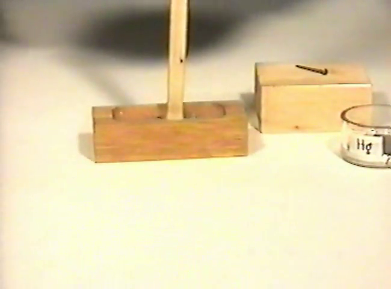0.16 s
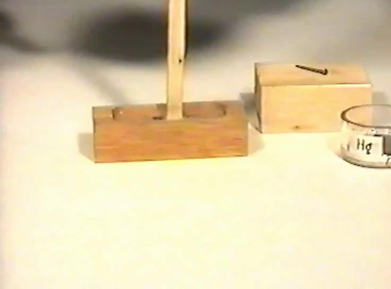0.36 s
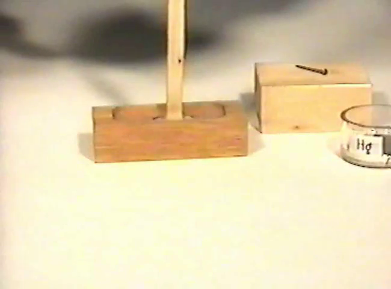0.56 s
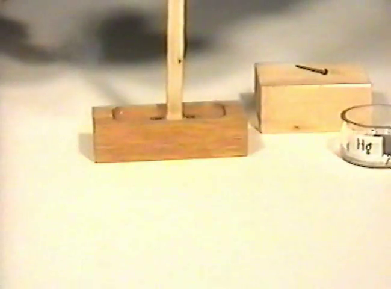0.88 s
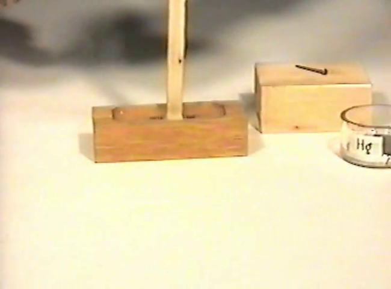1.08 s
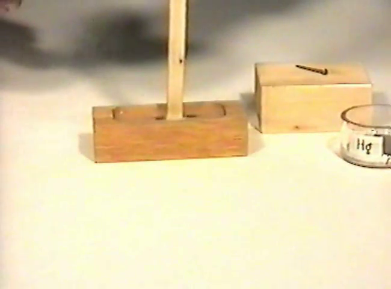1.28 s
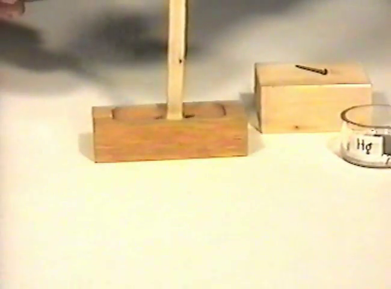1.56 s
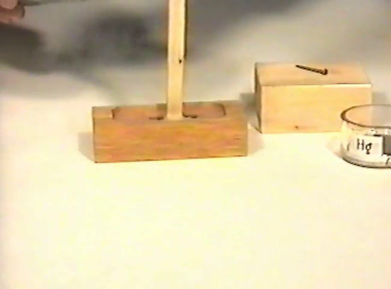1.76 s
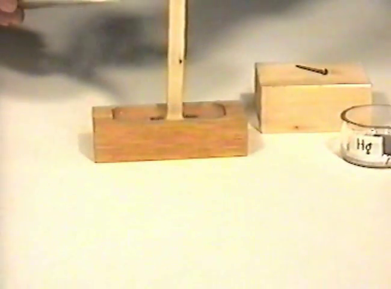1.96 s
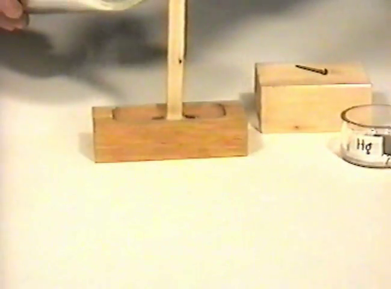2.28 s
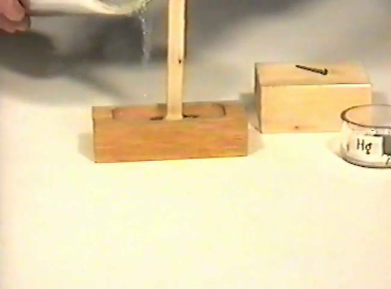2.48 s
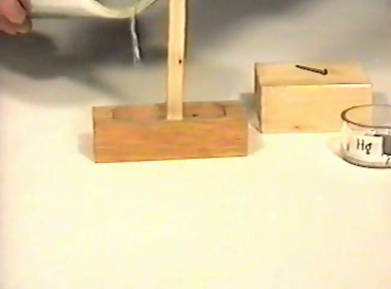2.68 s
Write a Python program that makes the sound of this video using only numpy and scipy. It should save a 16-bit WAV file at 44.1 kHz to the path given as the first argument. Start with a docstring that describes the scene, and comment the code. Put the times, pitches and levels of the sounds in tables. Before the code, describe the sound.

A faint fizzing simmer and dry wood ticks come first, then a short sharp sizzle, a brief gap, and a longer fierce hiss as freezing liquid is poured again; quiet room with tape noise, hum and faint whine.

```python
"""A soft simmer over hum and rumble is heard first, soon pricked by ticks of chilled wood in a quiet room.
Liquid nitrogen is poured twice into the hollow of a wooden mould on a table, and boils up under each pour.
Its boiling is random vapour bursts and gas noise, heard directly as spray and through resonances of the hollow.
Ticks are damped swings with fading noise; room air and rumble are filtered noise, hum and whine are sines.
An old tape machine sums two inverted tracks whose lag drifts, a moving comb filter that makes the hiss swirl."""
import sys
import numpy as np
from scipy import signal
from scipy.fft import rfft, irfft
from scipy.io import wavfile
from scipy.ndimage import map_coordinates

SR = 44100
rng = np.random.default_rng(int(sys.argv[2]) if len(sys.argv) > 2 else 0)


def transcribe(signal):
    """Save signal, clipped to [-1, 1], as a 16-bit WAV file at the path in sys.argv[1]."""
    frames = np.atleast_2d(signal).T
    limited = np.clip(frames, -1, 1)
    pcm = np.round(limited * 32767).astype(np.int16)
    wavfile.write(sys.argv[1], SR, pcm)


N = 125244  # samples

# Spectra below are relative: each sound is scaled to its own level after filtering.
# Room air, spectrum: (frequency [Hz], level [dB])
ROOM_SPECTRUM = [(30, -14), (90, -12), (130, -12.5), (230, -0.5), (400, 0), (650, -1.5), (900, -1.5),
                 (1150, -7.5), (1550, -5), (2000, -5), (3000, -12), (7000, -13), (12000, -25), (14500, -29)]
# Mains hum, sines: (frequency [Hz], rms level [dB])
HUM_TONES = [(50, -51), (100, -63.5), (150, -51.5), (300, -66)]
# Faint whine, sines before their moving level: (frequency [Hz], rms level [dB])
WHINE_TONES = [(450, -47), (1513, -55)]
# Moving level of the whine: (time [s], gain [dB])
WHINE_GAIN = [(0, -9), (1.1, -7), (1.45, 2), (1.9, -8), (2.25, -1), (2.84, -3)]
# Tape machine rumble, spectrum: (frequency [Hz], level [dB])
RUMBLE_SPECTRUM = [(10, -60), (22, -34), (33, -6), (46, -10), (58, 9), (68, -12), (82, -8), (130, -31),
                   (400, -82)]
# Rumble before its flutter: (time [s], level [dB])
RUMBLE_COURSE = [(0, -43.5), (1.85, -41), (1.98, -39), (2.04, -49), (2.14, -38.5), (2.25, -46), (2.40, -37),
                 (2.46, -42), (2.6, -37.5), (2.84, -42.5)]
# Ticks of the chilled wood: (time [s], peak of the swing [dB], swing frequency and noise cutoff [Hz])
WOOD_TICKS = [(.0612, -15, 2400), (.0732, -11, 1500), (.6278, -22, 2500), (1.0541, -13, 1800),
              (1.0595, -15, 1100), (1.0738, -19, 500), (1.4935, -17, 1800), (1.789, -16, 2200),
              (2.178, -16, 1600), (2.190, -17, 1300), (2.585, -17, 2600), (2.7435, -17, 1800)]
# Simmering of the liquid left in the mould, spectrum: (frequency [Hz], level [dB])
SIMMER_SPECTRUM = [(1000, -23), (2100, -13), (2650, 0), (3500, -2), (4200, -6), (5400, -4.5), (6600, -2.5),
                   (7300, -7.5), (8000, -12), (9800, -14), (12000, -36), (14500, -41)]
# Boiling before sputter and spurts: (time [s], level [dB])
BOIL_COURSE = [(0, -48), (.58, -56), (.68, -35), (.77, -45), (1.27, -46), (1.31, -27), (1.41, -27),
               (1.49, -23), (1.56, -26.5), (1.64, -25.5), (1.70, -28), (1.78, -29.5), (1.82, -51),
               (1.94, -47), (2.035, -28.5), (2.055, -25), (2.17, -23.5), (2.42, -23.5), (2.56, -22),
               (2.63, -24.5), (2.74, -21.5), (2.84, -23)]
# Spurts where a splash flashes to vapour: (time [s], rise [dB])
VAPOUR_SPURTS = [(1.453, 4.5), (1.640, 4.5), (2.163, 3), (2.333, 2), (2.553, 3), (2.772, 3.5)]
# Resonances of the hollow, level before swell and flicker:
# (frequency [Hz], width [Hz], level [dB], centre of first swell [s], centre of second swell [s])
HOLLOW_MODES = [(2287, 70, -6, 1.53, 2.4), (2743, 155, 0, 1.42, 2.52), (3227, 48, -1.5, 1.49, 2.25),
                (3680, 130, -2.5, 1.52, 2.51), (3930, 67, -6, 1.1, 2.5), (4120, 57, -6.5, 1.4, 2.15),
                (4580, 230, -4, 1.55, 2.63), (5020, 34, -9.5, 1.25, 4.7), (5460, 170, -4, 1.48, 2.88),
                (6250, 640, -3, 1.66, 2.8), (6700, 540, -3.5, 1.64, 1.97)]
# Slower sound in the cold vapour of the hollow: (time [s], pitch ratio [1])
CHILL_PITCH = [(1.55, 1.0), (2.2, .98)]
# Range in which the hollow radiates: (frequency [Hz], gain [dB])
HOLLOW_RADIATION = [(1500, -10), (2200, -1.5), (7200, 1), (8000, 0), (11000, -17), (14000, -40)]
# Spray heard directly, spectrum: (frequency [Hz], level [dB])
SPRAY_SPECTRUM = [(300, -6), (1000, -4.5), (1800, -6), (2500, -7), (4000, 5.5), (5200, -5.5), (6500, 7),
                  (7300, 5), (8000, -11), (9800, -7.5), (11200, -24), (14500, -48)]
# Lag of the second tape track behind the first: (time [s], lag [ms])
TAPE_LAG = [(0.0, 1.049), (0.2, 0.94), (0.26, 0.974), (0.3, 1.159), (0.34, 1.181), (0.43, 1.034),
            (0.48, 1.144), (0.53, 1.008), (0.65, 0.949), (0.74, 0.998), (0.82, 1.132), (0.86, 0.975),
            (0.89, 1.052), (1.01, 1.003), (1.09, 1.065), (1.14, 0.971), (1.27, 1.193), (1.31, 1.099),
            (1.42, 1.162), (1.49, 0.991), (1.58, 1.024), (1.64, 0.899), (1.75, 1.159), (1.81, 1.012),
            (1.89, 1.097), (2.11, 0.948), (2.19, 1.157), (2.25, 1.073), (2.35, 1.07), (2.44, 0.96),
            (2.59, 0.9), (2.69, 1.07), (2.74, 0.941), (2.83, 0.972)]
# Second track against the first, before its waver: (frequency [Hz], gain [dB])
TAPE_BALANCE = [(100, -2.3), (1000, -2.1), (2000, -1.5), (3000, -1), (4000, -.4), (5000, -1.8), (7000, -7),
                (12000, -11)]

ROOM_DB, SIMMER_DB = -33, -34
RUMBLE_FLUTTER_HZ, RUMBLE_FLUTTER_DB = 39.8, 2
TICK_DAMPING = .35  # decay per radian of the swing
TICK_CRACK_DB, TICK_CRACK_S = -10, .0015
TICK_TAIL_DB, TICK_TAIL_S = -22, .014
BURSTS_PER_S, BURST_SPREAD_DB = 2500, 3
BURST_SHARE = .36  # part of the fizz power held by bursts
SIMMER_SWELL_HZ, SIMMER_SWELL_DB = 12.4, .12
SPUTTER_HZ, SPUTTER_DB, SPURT_S = 70.1, .88, .006
HOLLOW_DB, SPRAY_DB = -1.5, -5  # balance within the boiling
SWELL_DB, SWELL_S = 3.5, .095
RING_FLICKER_HZ, RING_FLICKER_DB = 40.1, .9
RING_DRIFT = .003  # spread of the wavering pitch ratio
TRACK_WAVER_HZ, TRACK_WAVER_DB = 14, .6
TOP_HZ = 14550


def undb(db):
    """Logarithmic level: convert decibels to amplitude gain."""
    return 10 ** (np.asarray(db) / 20)


def unit(x):
    """Normalisation of power: scale to rms 1."""
    return x / np.sqrt(np.mean(x ** 2))


def curve(rows):
    """Linear interpolation: join (time, value) rows by straight lines."""
    return np.interp(np.arange(N) / SR, *np.array(rows).T)


def colour(x, points):
    """Linear filtering: multiply the spectrum by gains joined over log frequency."""
    hz, db = np.array(points).T
    f = np.maximum(np.arange(N // 2 + 1) * SR / N, 1)
    gain = undb(np.interp(np.log(f), np.log(hz), db))
    return irfft(rfft(x) * gain, N)


def ring(x, hz, width):
    """Resonance: a second-order peak with gain 1 at its centre."""
    b, a = signal.iirpeak(hz, hz / width, fs=SR)
    return signal.lfilter(b, a, x)


def walk(hz):
    """Band-limited fluctuation: smoothly joined random knots, hz per second, with rms 1."""
    knots = rng.standard_normal(size=2048)
    return unit(map_coordinates(knots, [np.arange(N) / SR * hz], mode="mirror"))


def bump(centre, width):
    """Gaussian envelope: rise to 1 at the centre and fall again."""
    t = np.arange(N) / SR
    return np.exp(-.5 * ((t - centre) / width) ** 2)


def delay(x, seconds):
    """Time delay: a moving lag also shifts the pitch."""
    return map_coordinates(x, [np.arange(N) - seconds * SR], mode="mirror")


def room():
    """Stationary noise: filtered random air motion gives the steady room tone."""
    return undb(ROOM_DB) * unit(colour(rng.standard_normal(N), ROOM_SPECTRUM))


def tones(rows):
    """Superposition: sum steady sines with random phases."""
    t = np.arange(N) / SR
    total = np.zeros(N)
    for hz, db in rows:
        peak = np.sqrt(2) * undb(db)
        total += peak * np.sin(2 * np.pi * (hz * t + rng.random()))
    return total


def machine():
    """Amplitude modulation: steady hum, a whine that comes and goes, and fluttering low noise."""
    whine = undb(curve(WHINE_GAIN)) * tones(WHINE_TONES)
    rumble_db = curve(RUMBLE_COURSE) + RUMBLE_FLUTTER_DB * walk(RUMBLE_FLUTTER_HZ)
    rumble = undb(rumble_db) * unit(colour(rng.standard_normal(N), RUMBLE_SPECTRUM))
    return tones(HUM_TONES) + whine + rumble


def ticks():
    """Damped oscillation: each tick is a heavily damped swing with a brief crack and a short dull tail."""
    out = np.zeros(N)
    for at, db, hz in WOOD_TICKS:
        age = np.maximum(np.arange(N) / SR - at, 0)
        turn = 2 * np.pi * hz * age
        swing = -np.sin(turn) * np.exp(-TICK_DAMPING * turn)
        lowpass = signal.butter(4, hz, fs=SR, output="sos")
        noise = unit(signal.sosfilt(lowpass, rng.standard_normal(N)))
        crack = undb(TICK_CRACK_DB) * np.exp(-age / TICK_CRACK_S)
        tail = undb(TICK_TAIL_DB) * np.exp(-age / TICK_TAIL_S)
        out += undb(db) * (swing / np.abs(swing).max() + noise * (age > 0) * (crack + tail))
    return out


def fizz():
    """Shot noise: random vapour bursts of uneven size over the rush of gas."""
    struck = rng.random(N) < BURSTS_PER_S / SR
    sign = rng.choice([-1, 1], N)
    size = undb(BURST_SPREAD_DB * np.minimum(rng.exponential(size=N), 4))
    bursts = unit(struck * sign * size)
    return np.sqrt(BURST_SHARE) * bursts + np.sqrt(1 - BURST_SHARE) * rng.standard_normal(N)


def simmering():
    """Gentle boiling: filtered bursts and gas noise swell slightly."""
    db = SIMMER_DB + SIMMER_SWELL_DB * walk(SIMMER_SWELL_HZ)
    return undb(db) * unit(colour(fizz(), SIMMER_SPECTRUM))


def hollow_ring():
    """Cavity resonance: fizz drives modes whose pitch wavers and sinks as cold vapour fills the hollow."""
    total = np.zeros(N)
    for hz, width, mode_db, *swell_times in HOLLOW_MODES:
        pitch = curve(CHILL_PITCH) + RING_DRIFT * walk(RING_FLICKER_HZ)
        lag_s = np.cumsum(1 - pitch) / SR  # a growing lag lowers the pitch
        mode = unit(delay(ring(fizz(), hz, width), lag_s))
        swell_db = SWELL_DB * sum(bump(at, SWELL_S) for at in swell_times)
        flicker_db = RING_FLICKER_DB * walk(RING_FLICKER_HZ)
        total += mode * undb(mode_db + swell_db + flicker_db)
    return unit(colour(total, HOLLOW_RADIATION))


def boiling():
    """Violent boiling: vapour under the stream is heard as hollow ringing and direct spray."""
    db = curve(BOIL_COURSE) + SPUTTER_DB * walk(SPUTTER_HZ)
    for at, rise in VAPOUR_SPURTS:
        db = db + rise * bump(at, SPURT_S)
    spray = unit(colour(fizz(), SPRAY_SPECTRUM))
    return undb(db) * (undb(HOLLOW_DB) * hollow_ring() + undb(SPRAY_DB) * spray)


def scene():
    """Superposition: room air, ticks, simmering and boiling add."""
    return (room() + ticks() + simmering() + boiling())[None]


def record(dry):
    """Comb filtering: inverted tracks add with wandering lag and balance; hum joins and the top is cut."""
    first = dry[0]
    lag_s = curve(TAPE_LAG) / 1000
    waver = undb(TRACK_WAVER_DB * walk(TRACK_WAVER_HZ))
    second = delay(colour(first, TAPE_BALANCE), lag_s) * waver
    tape = (first - second) / np.sqrt(2) + machine()
    top_cut = signal.ellip(12, .2, 80, TOP_HZ, fs=SR, output="sos")
    return signal.sosfilt(top_cut, tape)[None]


dry = scene()
out = record(dry)
transcribe(out)
```